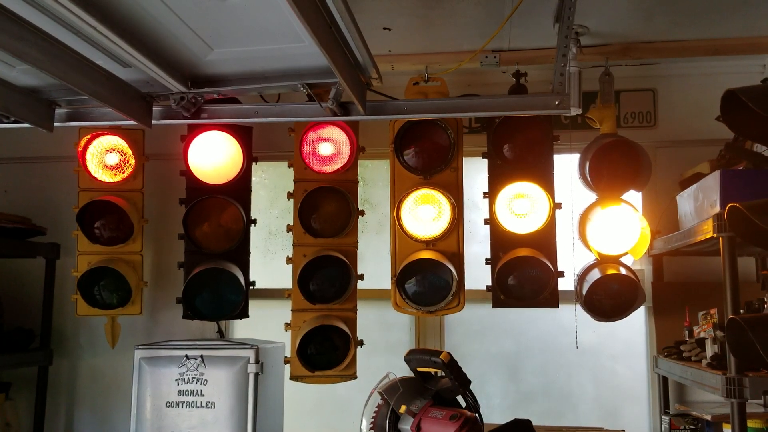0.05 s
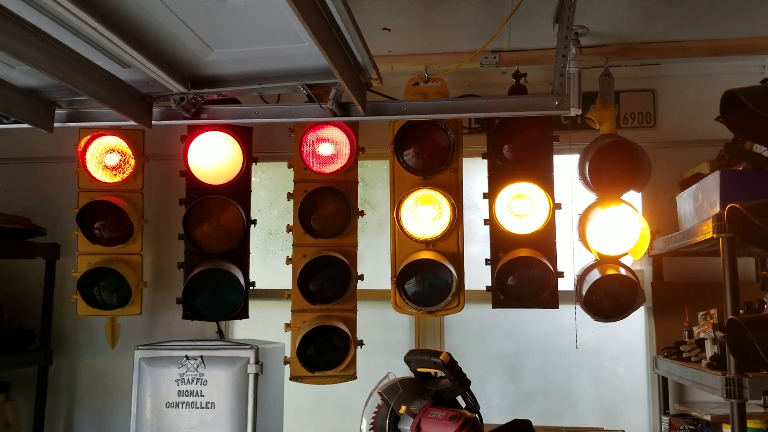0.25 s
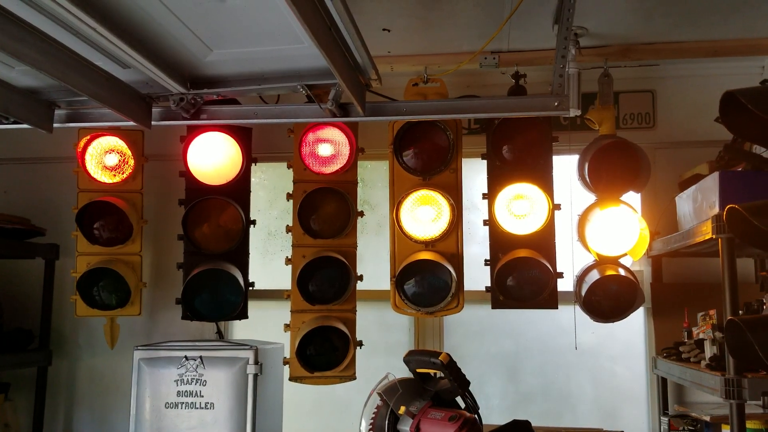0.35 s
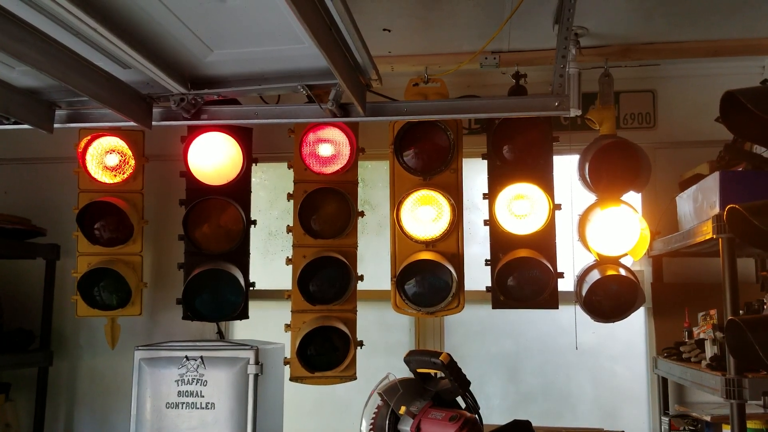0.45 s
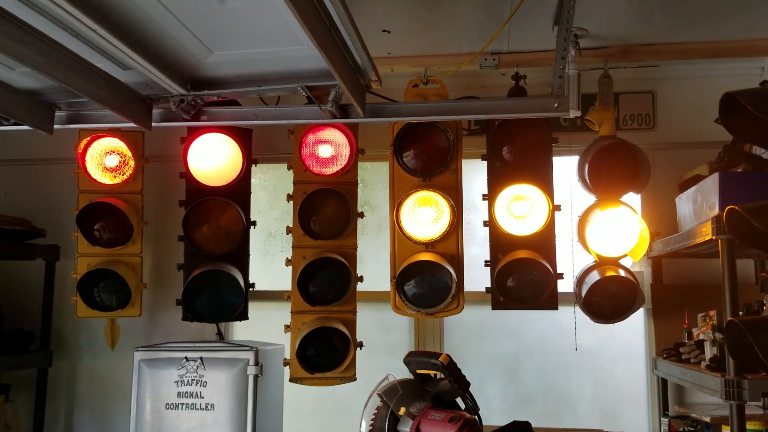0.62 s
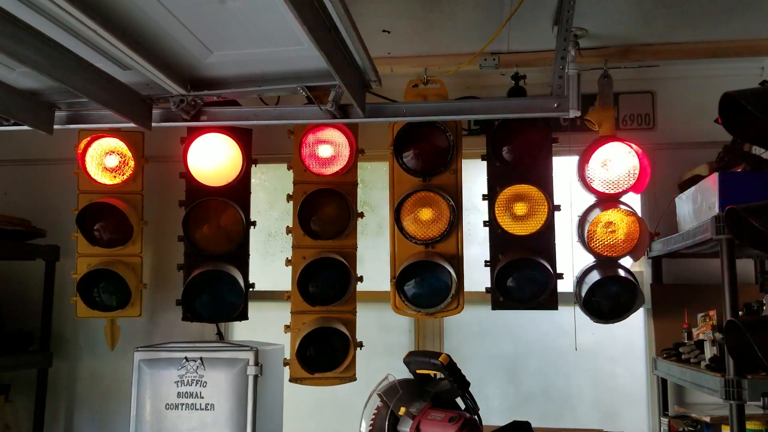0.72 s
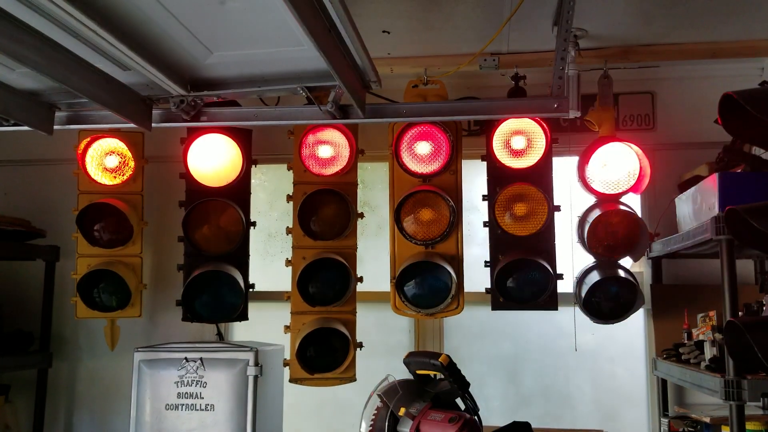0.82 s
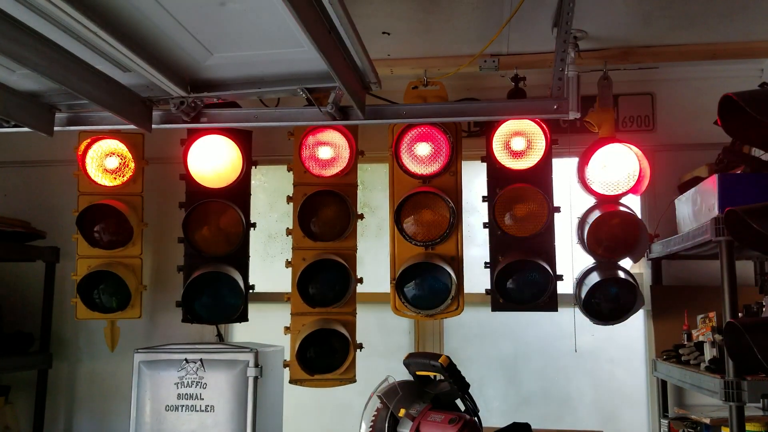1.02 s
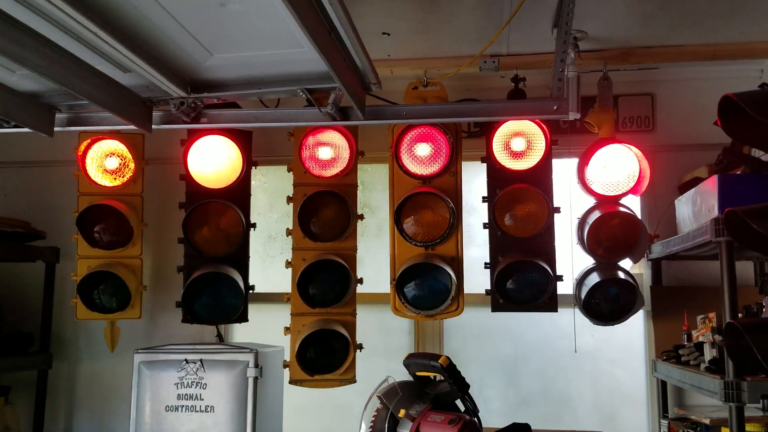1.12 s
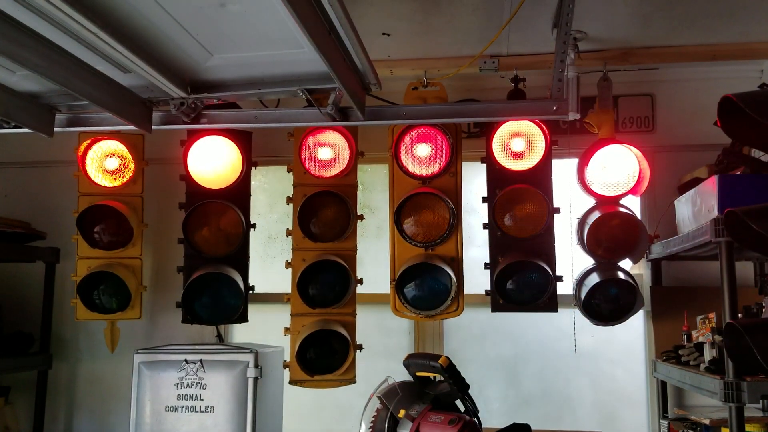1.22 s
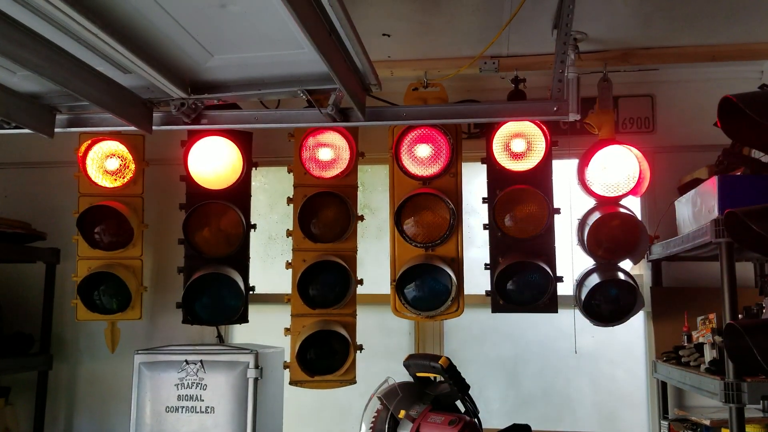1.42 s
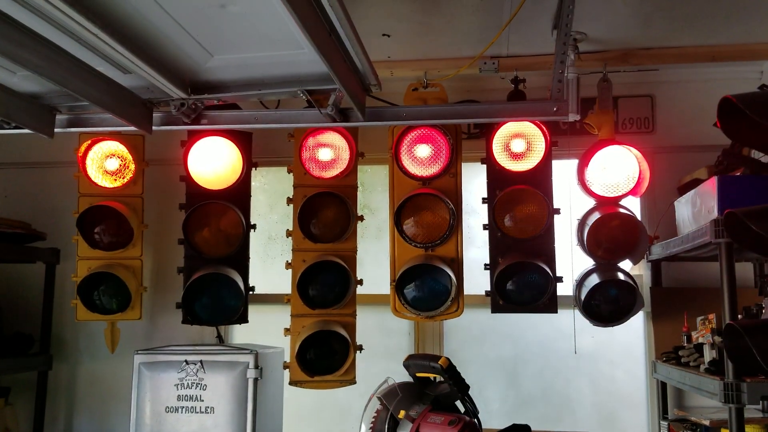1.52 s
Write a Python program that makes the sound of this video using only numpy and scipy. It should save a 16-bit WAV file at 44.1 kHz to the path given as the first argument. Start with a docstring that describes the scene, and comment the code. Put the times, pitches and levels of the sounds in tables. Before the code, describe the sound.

A traffic signal controller pulls in with a sharp, clattering clunk at about 0.2 seconds, and its metal cabinet booms briefly in the garage. A low electric hum holds until a second, brighter clunk at about 0.7 seconds. Faint birds chirp outside, with a falling call from 1.0 to 1.2 seconds and a thin whistle near 1.4. A quiet low rumble runs underneath.

```python
"""Traffic signal controller in a garage

A solenoid steps the camshaft: it pulls in with a clunk, hums, and lets go with a brighter clunk.
Each clunk is a quick clatter of contacts that excites the cabinet's modes, the close bass modes
beating as they boom. Birds call outside, smeared by reverberation, over a low steady rumble."""
import sys
import numpy as np
from scipy import signal
from scipy.fft import rfft, irfft, next_fast_len
from scipy.io import wavfile
from scipy.ndimage import map_coordinates

SR = 44100
rng = np.random.default_rng(int(sys.argv[2]) if len(sys.argv) > 2 else 0)


def output_pcm(signal):
    """Save a mono or channel-first signal as 16-bit PCM at the path in sys.argv[1].

    Samples are clipped to [-1, 1] before scaling.
    """
    pcm = np.clip(np.atleast_2d(signal).T, -1, 1) * 32767
    wavfile.write(sys.argv[1], SR, np.round(pcm).astype(np.int16))


N = 68355
TIME = np.arange(N) / SR


def amp(db):
    """Amplitude ratio of a level in decibels."""
    return 10 ** (np.asarray(db) / 20)


def along(points, hz):
    """Interpolation of (frequency, value) points on a logarithmic frequency axis."""
    point_hz, values = np.transpose(points)
    return np.interp(np.log(hz + 1), np.log(point_hz + 1), values)


def wobble(rate_hz):
    """Smooth random modulation: a spline through Gaussian values drawn at rate_hz."""
    return map_coordinates(rng.standard_normal(int(N * rate_hz / SR) + 4), [TIME * rate_hz])


def filtered(x, response):
    """Linear filtering: the spectrum is multiplied by a frequency response."""
    size = next_fast_len(N + SR // 4)
    return irfft(rfft(x, size) * response(np.fft.rfftfreq(size, 1 / SR)), size)[..., :N]


# Likeness of left and right in the sound field: frequency_hz, correlation
COHERENCE = [(100, 0.98), (290, 0.9), (480, 0.69), (700, 0.52), (1400, -0.11), (3000, -0.0017)]

def diffuse_noise(spectrum, low_cut_hz=0):
    """A diffuse field of unit rms: long wavelengths reach both channels nearly alike."""
    def response(hz):
        angle = np.arccos(np.clip(along(COHERENCE, hz), -1, 1)) / 2
        gain = amp(along(spectrum, hz)) / (1 + (low_cut_hz / (hz + 1)) ** 10)
        return gain * np.array([np.cos(angle), np.sin(angle)])
    mid, side = filtered(rng.standard_normal((2, N)), response)
    stereo = np.array([mid + side, mid - side])
    return stereo / np.sqrt(np.mean(stereo ** 2))


# Reverberation time of the garage: frequency_hz, t60_s
GARAGE_DECAY = [(200, 0.46), (600, 0.53), (1500, 0.47), (3500, 0.39), (7500, 0.27), (13000, 0.27)]

def garage_decay(x, stretch=1, build_s=0.0033):
    """Reflections build up, then absorption makes them decay exponentially, the treble first."""
    hz, t, spectra = signal.stft(x, SR, nperseg=256)
    t60_s = stretch * along(GARAGE_DECAY, hz)[:, None]
    decayed = signal.istft(spectra * amp(-60 * t / t60_s), SR, nperseg=256)[1]
    return decayed[:, :N] * (1 - np.exp(-TIME / build_s))


def reverberate(x, direct, room, stretch=0.88):
    """Direct sound plus its convolution with the garage's stereo impulse response."""
    impulse = garage_decay(rng.standard_normal((2, N)), stretch)
    impulse /= np.linalg.norm(impulse[0])
    return direct * x + room * signal.fftconvolve(x[None], impulse, axes=1)[:, :N]


# Spectrum of the ambient noise: frequency_hz, gain_db
RUMBLE_SPECTRUM = [(25, -10.5), (45, -17.5), (62, 3.5), (78, 10), (100, -4.5), (160, -3), (220, -8),
                   (320, -11.5), (450, -27), (800, -18), (1150, -23.5), (1700, -32.5), (4000, -36.5),
                   (9000, -39.5), (15000, -36)]
# Steady low tones, the idle mains hum among them: pitch_hz, level_db
RUMBLE_PARTIALS = [(80, -61.5), (120, -62.5), (217, -75)]
COIL_ON_S = 0.1866  # also the phase origin of the low tones

def rumble(noise_db=-57.5, waver_db=1.0):
    """Ambient noise: a continuous spectrum of rumble and faint hiss, with a few wavering tones."""
    tones = sum(amp(db + waver_db * wobble(7.8)) * np.sin(2 * np.pi * hz * (TIME - COIL_ON_S))
                for hz, db in RUMBLE_PARTIALS)
    return amp(noise_db) * diffuse_noise(RUMBLE_SPECTRUM) + tones


# Slides of the linkage: start_s, end_s, final_level_db, swell_db, tilt_db_per_octave
LINKAGE_SLIDES = [(0.106, 0.229, -51, 32, -2), (0.616, 0.704, -51.5, 25, 2)]
# Spectrum of the scrape before tilting: frequency_hz, gain_db
SCRAPE_SPECTRUM = [(100, -18.5), (230, -5), (335, 7), (420, -3), (540, 2.5), (800, -3), (1900, -18.5),
                   (3050, -9.5), (4300, -19), (5600, -21), (7000, -33), (15000, -52)]

def linkage(fall_s=0.038, pivot_hz=700):
    """Sliding friction makes a broadband scrape that swells up to each clunk."""
    out = np.zeros((2, N))
    for start_s, end_s, final_db, swell_db, tilt in LINKAGE_SLIDES:
        swell = amp(final_db + swell_db * np.minimum((TIME - end_s) / (end_s - start_s), 0))
        fall = np.exp(-np.maximum(TIME - end_s, 0) / fall_s)
        spectrum = [(hz, db + tilt * np.log2(hz / pivot_hz)) for hz, db in SCRAPE_SPECTRUM]
        out += (TIME > start_s) * swell * fall * diffuse_noise(spectrum)
    return out


def bird_phase(pitch_hz, depth_hz=0, trill_hz=136.7, uneven=0.176, rasp_hz=0):
    """Frequency modulation of a bird's tone: an uneven trill, and random jitter heard as rasp."""
    trill = np.sin(2 * np.pi * np.cumsum(trill_hz * (1 + uneven * wobble(90))) / SR)
    return 2 * np.pi * np.cumsum(pitch_hz + depth_hz * trill + rasp_hz * wobble(450)) / SR


def gate(start_s, length_s, edge_s):
    """A trapezoidal amplitude envelope."""
    return np.clip(np.minimum(TIME - start_s, start_s + length_s - TIME) / edge_s, 0, 1)


# Short bird notes: start_s, length_s, start_hz, end_hz, level_db, trill_depth_hz
CHIRPS = [(0.122, 0.053, 2780, 2773, -66.5, 140), (0.111, 0.083, 6060, 5930, -78, 99),
          (.141, .046, 2790, 2730, -59, 120), (.386, .05, 2680, 2800, -61.5, 120),
          (0.848, 0.097, 3555, 3530, -76, 420), (1.486, 0.045, 6220, 6330, -79.5, 60)]

def bird_chirps(edge_s=0.006):
    """Frequency-modulated tones glide slightly and are smeared by reflections from the walls."""
    out = np.zeros(N)
    for start_s, length_s, start_hz, end_hz, db, depth_hz in CHIRPS:
        pitch_hz = np.interp(TIME, [start_s, start_s + length_s], [start_hz, end_hz])
        tone = np.sqrt(2) * np.sin(bird_phase(pitch_hz, depth_hz))
        out += amp(db) * gate(start_s, length_s, edge_s) * tone
    return reverberate(out, direct=0.6, room=0.72)


# Harmonics of the hum, from the fundamental up: level_db
HUM_HARMONICS = [-37, -49, -57, -62, -80, -76.5, -76]
# Spectrum of the armature's buzz: frequency_hz, gain_db
BUZZ_SPECTRUM = [(100, -3.5), (220, 10.5), (450, -3.5), (750, -9), (1200, -16), (1580, -7.5), (1900, -43),
                 (4000, -49), (9000, -38.5)]

def solenoid(hum_hz=120, off_s=0.698, rise_s=0.061, fall_s=0.051, buzz_db=-53.5):
    """Magnetic force pulses at twice the mains frequency: the coil hums, its loose armature buzzes."""
    waver_db, jitter_rad, chatter_depth = 1.5, 0.17, 0.26
    t = TIME - COIL_ON_S
    envelope = np.clip(t / rise_s, 0, 1) * np.exp(-np.maximum(TIME - off_s, 0) / fall_s)
    phase = 2 * np.pi * hum_hz * t
    hum = sum(amp(db + waver_db * wobble(30.25)) * np.sin(k * (phase + jitter_rad * wobble(38.94)))
              for k, db in enumerate(HUM_HARMONICS, 1))
    buzz = amp(buzz_db) * (1 + chatter_depth * np.sin(phase)) * diffuse_noise(BUZZ_SPECTRUM)
    return envelope * (hum + buzz)


# Contacts as the solenoid pulls in, and as it lets go and the cams drop: start_s, level_db
PULL_CONTACTS = [(.231, -39.5), (.241, -38), (.256, -35.5), (.269, -45), (.299, -55)]
RELEASE_CONTACTS = [(.624, -66), (.709, -41), (.718, -40.5), (.731, -39), (.746, -63.5), (.800, -60)]
# Spectra of the two clatters: frequency_hz, gain_db
PULL_SPECTRUM = [(150, 3), (250, -4.5), (420, -4.5), (600, -11.5), (720, -16), (1160, -12.5), (1330, -17.5),
                 (1600, -16.5), (1900, -20), (2500, -19), (3300, -22), (4200, -19.5), (4900, -26.5),
                 (5900, -26), (6900, -33), (7800, -28.5), (9000, -39.5), (12000, -45.5), (15500, -54)]
RELEASE_SPECTRUM = [(150, 3), (250, -6.5), (340, -3), (600, -7), (850, -15.5), (1120, -14), (1400, -19),
                    (2360, -21), (3000, -16.5), (4600, -21), (5500, -19.5), (6400, -26.5), (7400, -23),
                    (8050, -18), (8500, -29.5), (10400, -37.5), (12050, -29), (12800, -33), (14200, -32),
                    (15500, -44)]

def clatter():
    """Impulsive excitation: each metal contact sends a burst of reflections round the garage."""
    out = np.zeros((2, N))
    for contacts, spectrum in (PULL_CONTACTS, PULL_SPECTRUM), (RELEASE_CONTACTS, RELEASE_SPECTRUM):
        for start_s, db in contacts:
            start = round(start_s * SR)
            burst = garage_decay(diffuse_noise(spectrum, low_cut_hz=205))
            out[:, start:] += amp(db) * burst[:, :N - start]
    return out


def mode(start_s, pitch_hz, t60_s, rise_s):
    """A damped resonance: a sinusoid that swells and decays exponentially."""
    t = np.maximum(TIME - start_s, 0)
    return np.sin(2 * np.pi * pitch_hz * t) * amp(-60 * t / t60_s) * (1 - np.exp(-t / rise_s))


# Knocks of the armature: start_s, pitch_hz, level_db, t60_s
ARMATURE_KNOCKS = [(0.2422, 221, -3, 0.076), (.241, 460, -15.5, 0.091), (.236, 590, -21, 0.076),
                   (.232, 620, -27, 0.13), (.328, 322, -20, 0.092), (.709, 332, -26, 0.11),
                   (.716, 950, -26, 0.076), (.797, 238, -26, 0.22), (.790, 323, -20.5, .12),
                   (.815, 710, -27, 0.071)]

def armature(rise_s=0.049):
    """Heavily damped modes die quickly and are heard as dull knocks."""
    return sum(amp(db) * mode(start_s, hz, t60_s, rise_s) for start_s, hz, db, t60_s in ARMATURE_KNOCKS)


# Blows on the cabinet, pull-in then release: start_s, boom_gain_db
CABINET_BLOWS = [(.2486, 1.5), (0.7316, -2)]
# Closely spaced bass modes: pitch_hz, level_db, t60_s
BASS_MODES = [(121.4, -23.5, 0.51), (130.12, -14, 0.38), (137.6, -25.5, 0.49)]
# Sheet-metal modes: pitch_hz, pull_level_db, release_level_db, t60_s
PANEL_MODES = [(225.9, -37, -42, 0.65), (271.8, -49, -41.5, 0.767), (319.4, -45, -40, 0.52),
               (422, -35.5, -50, 0.32), (450, -60, -46, 0.45), (490.5, -48, -74.5, 0.79),
               (551.5, -55.5, -66, 0.31), (613, -55, -64, 0.46), (645, -52, -48.5, 0.45),
               (759.6, -49.5, -54.5, 0.49), (1115, -53, -51.5, 0.58), (1558, -51, -64, 0.48),
               (1560, -49, -65, 0.73), (1660, -53, -56, 0.51)]

def cabinet(boom_rise_s=0.066, ring_rise_s=0.0027, scatter_db=0.64):
    """Free vibration after each blow: the sheet metal rings, and neighbouring bass modes beat."""
    out = np.zeros((2, N))
    for blow, (start_s, boom_db) in enumerate(CABINET_BLOWS):
        for hz, db, t60_s in BASS_MODES:
            out += amp(boom_db + db) * mode(start_s, hz, t60_s, boom_rise_s)
        for hz, *levels_db, t60_s in PANEL_MODES:
            channel_gains = amp(levels_db[blow] + rng.normal(0, scatter_db, (2, 1)))
            out += channel_gains * mode(start_s, hz, t60_s, ring_rise_s)
    return out


# Contour of the falling call: time_s, lower_pitch_hz, upper_pitch_hz, level_db
CALL_CONTOUR = [(0.967, 3080, 3930, -68.5), (1.003, 3090, 3950, -61.5), (1.042, 3150, 3830, -53),
                (1.086, 3130, 3600, -55.5), (1.13, 2790, 3480, -58), (1.18, 2570, 3130, -61.5),
                (1.222, 2220, 2820, -59.5), (1.245, 2250, 2950, -85)]

def bird_call(overtone_db=-22.5):
    """A far bird's two buzzy voices fall in pitch; at a distance, reverberation outweighs direct sound."""
    times_s, *columns = np.transpose(CALL_CONTOUR)
    lower_hz, upper_hz, level_db = [np.interp(TIME, times_s, column) for column in columns]
    envelope = amp(level_db) * (TIME > times_s[0]) * (TIME < times_s[-1])
    out = np.zeros(N)
    for pitch_hz in (lower_hz, upper_hz):
        phase = bird_phase(pitch_hz, depth_hz=155, uneven=0.3, rasp_hz=60)
        out += envelope * (np.sin(phase) + amp(overtone_db) * np.sin(2 * phase))
    return reverberate(out, direct=0.35, room=0.9, stretch=1.55)


# Flutter of a thin whistle as it is heard: start_s, length_s, pitch_hz, level_db
WHISTLE_FLUTTER = [(1.364, .039, 2532, -56), (1.403, .039, 2485, -52.5), (1.452, .014, 2504, -58),
                   (1.472, 0.017, 2520, -59), (1.516, 0.039, 2510, -66)]

def bird_whistle(edge_s=0.0038):
    """A thin, almost pure bird whistle that flutters and fades in the reverberation."""
    out = np.zeros(N)
    for start_s, length_s, pitch_hz, db in WHISTLE_FLUTTER:
        tone = np.sqrt(2) * np.sin(bird_phase(pitch_hz, rasp_hz=22))
        out += amp(db) * gate(start_s, length_s, edge_s) * tone
    return reverberate(out, direct=0.95, room=0.5)


def scene(left_lead_s=0.0002, pan_db=0.74):
    """Superposition of the sources; time and level differences place them a little to the left."""
    sides = np.array([[1], [-1]])
    indoors = rumble() + linkage() + solenoid() + clatter() + armature() + cabinet()
    indoors = filtered(indoors, lambda hz: np.exp(1j * np.pi * hz * left_lead_s * sides))
    birds = bird_chirps() + bird_call() + bird_whistle()
    return (indoors + birds) * amp(pan_db * sides)


def record(dry, cutoff_hz=15720):
    """Band limiting by an ideal low-pass filter."""
    return filtered(dry, lambda hz: hz < cutoff_hz)


dry = scene()
out = record(dry)
output_pcm(out)
```